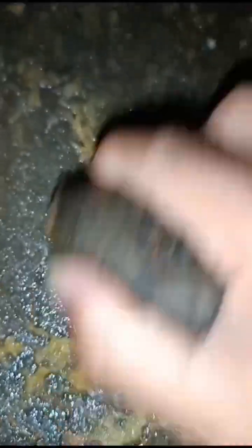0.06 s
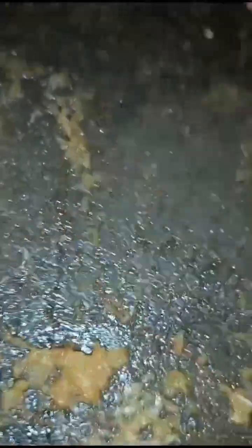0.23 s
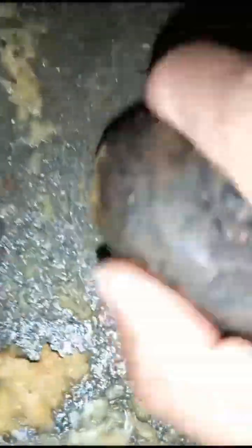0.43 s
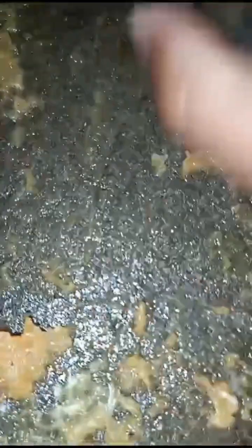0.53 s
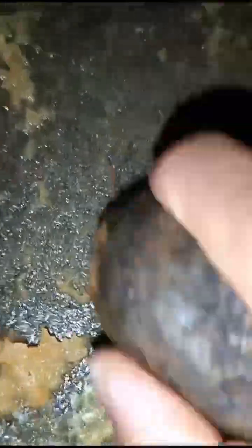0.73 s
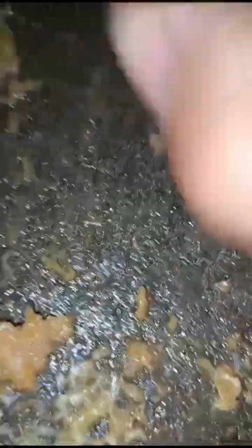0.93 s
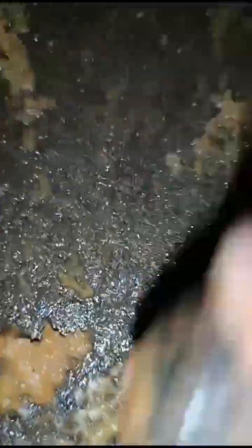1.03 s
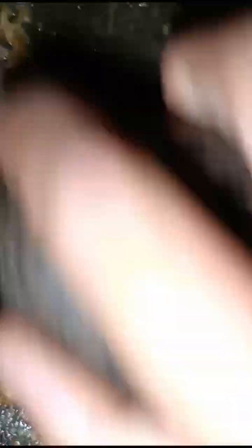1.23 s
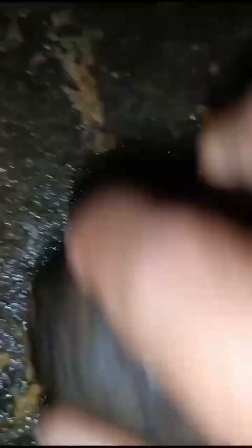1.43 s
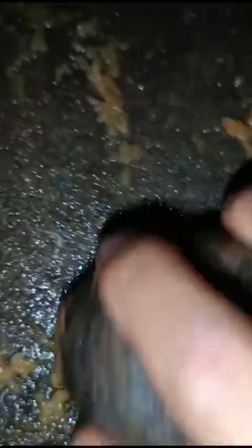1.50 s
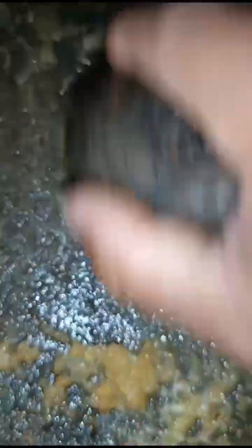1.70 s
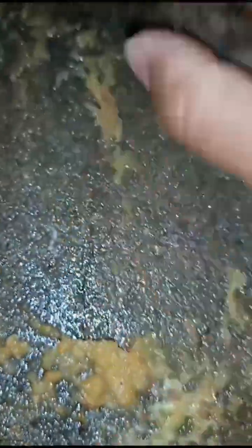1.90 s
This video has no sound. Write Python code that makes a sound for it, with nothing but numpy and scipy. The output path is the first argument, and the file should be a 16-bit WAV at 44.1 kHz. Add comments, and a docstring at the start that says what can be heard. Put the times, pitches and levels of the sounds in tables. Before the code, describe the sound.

A hand stone grinds garlic on a stone slab, close by in a quiet kitchen. It lands with a hard clack, rasps four times, pauses, thuds down and rasps about five more times, with faint wet crackles.

```python
"""A hand stone grinds garlic on a stone slab in a kitchen, heard from close by.
After a faint scrape the stone lands, and the impact excites its modes in a hard clack. Four strokes
follow: friction on grit rings both stones, wet garlic hisses, spits and snaps, and the slab rumbles
on its support. The stone lifts, then thuds down, cushioned by the paste. It rasps five more times
and slides to rest, leaving the quiet background of the room."""
import sys
import numpy as np
from scipy import signal
from scipy.fft import rfft, irfft
from scipy.io import wavfile
from scipy.ndimage import uniform_filter1d

SR = 44100
rng = np.random.default_rng(int(sys.argv[2]) if len(sys.argv) > 2 else 0)


def generate_wav(signal):
    """Clip the signal to [-1, 1] and save it as 16-bit WAV at the path in sys.argv[1]."""
    frames = np.transpose(np.atleast_2d(signal))
    scaled = np.clip(frames, -1, 1) * 32767
    pcm = np.round(scaled).astype(np.int16)
    wavfile.write(sys.argv[1], SR, pcm)


N = 85995
TIME = np.arange(N) / SR
HZ = np.fft.rfftfreq(2 * N, 1 / SR)
GRIT_PER_S, GRIT_SPREAD_DB = 6000, 4.5


def amp(db):
    """The decibel law: level to amplitude ratio."""
    return 10 ** (np.asarray(db) / 20)

def unit(x):
    """Normalisation to an rms of 1."""
    return x / np.sqrt(np.mean(x ** 2) + 1e-20)

def read(points, hz=HZ):
    """Interpolation of a table on a logarithmic frequency axis."""
    f, value = np.transpose(points)
    return np.interp(np.log(hz + 1), np.log(f), value)

def colour(x, points):
    """Minimum-phase filtering with the shape of a dB curve, at unit power gain."""
    log_gain = np.log(amp(read(points)))
    response = np.exp(np.conj(signal.hilbert(np.r_[log_gain, log_gain[-2:0:-1]])))[:N + 1]
    return irfft(rfft(x, 2 * N) * response / np.sqrt(np.mean(abs(response) ** 2)))[..., :N]

def pan(db):
    """Constant-power panning: two gains from a left-right level difference."""
    gains = amp(np.array([db, -db]) / 2)
    return gains / np.sqrt(np.mean(gains ** 2, 0))

def stereo(x, balance, phase=0):
    """Localisation by level and phase differences between the channels."""
    response = pan(read(balance)) * np.exp(-1j * phase * np.array([[0], [1]]))
    return irfft(rfft(x, 2 * N) * response)[:, :N]

def wander(hz):
    """Random modulation: low-passed noise, softly limited."""
    rolloff = 1 + (np.fft.rfftfreq(N, 1 / SR) / hz) ** 4
    slow = unit(irfft(rfft(rng.standard_normal(N)) / rolloff, N))
    return unit(np.tanh(slow / 1.6))

def grains(per_s, spread_db):
    """Shot noise: independent impulses of uneven size."""
    size = amp(spread_db * np.clip(rng.standard_normal(N), -2, 2))
    return unit(size * rng.choice([-1, 1], N) * (rng.random(N) < per_s / SR))

def patchy(x, width_hz, length_s, depth_db, size=256):
    """Spectral modulation: the colour shifts at random as the contact point moves."""
    spectra = signal.stft(x, nperseg=size)[2]
    field = rng.standard_normal(spectra.shape[:0:-1]).T
    bins, frames = max(round(width_hz * size / SR), 1), max(round(2 * length_s * SR / size), 1)
    for _ in range(2):
        field = uniform_filter1d(uniform_filter1d(field, bins, 0), frames, 1)
    return signal.istft(spectra * unit(amp(depth_db * unit(field))), nperseg=size)[1][:, :N]

def resonate(x, hz, width_hz):
    """A tunable damped resonance that preserves the power of white noise."""
    turn = np.exp(2j * np.pi * np.cumsum(hz * np.ones(N)) / SR)
    pole = np.exp(-np.pi * width_hz / SR)
    return (turn * signal.lfilter([np.sqrt(2 * (1 - pole ** 2))], [1, -pole], x / turn + 1e-18)).real


# Strokes of the hand (start [s], fastest [s], end [s], rasp level [dB], hiss level [dB],
# left-right [dB], hand stone base pitch [Hz], slab pitch [Hz], slab ring gain [dB], treble gain [dB])
STROKES = [(-.08, -0.005, 0.03, -42.5, -64.5, -6.5, 2130, 755, 3, -1.5),
           (0.225, 0.33, .39, -25, -50, -1.5, 2015, 773, -7, -2.5),
           (0.388, 0.488, 0.54, -30, -47.5, 1.5, 2188, 745, -2, 4),
           (0.531, 0.628, .69, -24.5, -48.5, -4.5, 2036, 766, -5.5, 4.5),
           (0.68, 0.764, 0.82, -28, -50.5, -0.5, 2024, 738, -0.5, 0.5),
           (1.084, 1.184, 1.278, -25, -48, -0.5, 2190, 612, -0.5, -0.5),
           (1.321, 1.365, 1.451, -29, -49.5, -1.5, 1970, 780, -8.5, 2.5),
           (1.433, 1.536, 1.5995, -26, -49, -3, 2187, 828.5, -5.5, 3),
           (1.603, 1.686, 1.738, -28, -49.5, -3.5, 2220, 860, -5.5, -2.5),
           (1.739, 1.797, 1.845, -33, -46, 0, 2220, 830, -1.5, -1.5),
           (1.8, 1.856, 1.912, -55.5, -62, -6, 2200, 830, -10, 15.5)]
# Broad response of the stones (frequency [Hz], relative level [dB])
STONE_RESPONSE = [(150, -27), (330, -18.5), (450, -11), (570, -4.5), (770, -4), (960, -8.5), (1080, -4.5),
                  (1270, -6), (1550, -4), (1750, -6), (2100, -7), (2420, -9.5), (2750, -9), (3200, -19.5),
                  (4000, -17.5), (5200, -28.5), (7000, -33.5), (10000, -59.5), (16000, -40.5)]
# Narrow modes of the slab (frequency [Hz], relative level [dB])
SLAB_MODES = [(580.7, -18.5), (787, -14.5), (1065, -15.5), (1428, -17.5), (2613, -17), (3888, -24.5)]
# Level difference of the rasp (frequency [Hz], left-right [dB])
RASP_BALANCE = [(300, -3), (550, 12), (780, 10), (960, 6), (1250, 12.5), (1550, 9.5), (1850, 2.5),
                (2200, -1), (2600, 1), (3300, -1), (4300, -3), (6000, 3)]
# Phase difference of the rasp (frequency [Hz], left lead [rad])
RASP_PHASE = [(300, 2.5), (450, 1.55), (600, -0.22), (850, -1.07), (1080, 2.5), (1350, 1.14), (1900, 0.94),
              (2150, 1.5), (2400, 1.5), (3200, 5)]

def rasp(echo_s=0.00281, echo_db=-17.5):
    """Forced vibration: grit drives the resonances of both stones."""
    _, fastest, _, level_db, _, side_db, hand_hz, slab_hz, slab_db, treble_db = np.transpose(STROKES)
    def by_stroke(values):
        return np.interp(TIME, fastest, values)
    body = colour(grit(level_db) + catches(), STONE_RESPONSE)
    # The path of a reflection across the slab changes with the stone's place.
    delay = echo_s * (1 + 0.19 * by_stroke((-1) ** np.arange(len(fastest))))
    body += amp(echo_db) * np.array([np.interp(TIME - delay, TIME, side) for side in body])
    treble = signal.sosfiltfilt(signal.butter(4, 3000, "high", fs=SR, output="sos"), body)
    body += treble * (amp(by_stroke(treble_db)) - 1)
    # The hand stone rings higher as it slows, and its pitch shifts with its place.
    ring_hz = by_stroke(hand_hz) * (1 + 0.08 * (1 - speeds().max(0)) + 0.034 * travel())
    rings = amp(0.5) * resonate(body, ring_hz, width_hz=266)
    rings += amp(by_stroke(slab_db)) * resonate(body, by_stroke(slab_hz), width_hz=146)
    rings += sum(amp(db) * resonate(body, hz, width_hz=0.025 * hz) for hz, db in SLAB_MODES)
    return stereo(0.65 * body + 0.2 * rings, RASP_BALANCE, read(RASP_PHASE)) * pan(by_stroke(side_db))

def speeds(grip=0.89):
    """Reciprocating motion: each stroke's speed is a flattened arch between turning points."""
    arch = np.array([np.sin(np.pi / 2 * np.interp(TIME, row[:3], [0, 1, 0])) for row in STROKES])
    return np.tanh(grip * arch) / np.tanh(grip)

def travel():
    """Displacement on the slab, -1 to 1: each stroke reverses the last."""
    return 2 * sum((-1) ** k * np.interp(TIME, row[:3], [0, .5, 1]) for k, row in enumerate(STROKES)) - 1

def friction(levels_db, exponent, drag_db, drag_s):
    """A power law: amplitude grows with speed, and light drag bridges the turning points."""
    energy = amp(levels_db) ** 2 @ speeds() ** (2 * exponent)
    drag = signal.fftconvolve(energy, np.hanning(int(2 * drag_s * SR)) / (drag_s * SR), "same")
    return np.sqrt(energy + amp(drag_db) ** 2 * abs(drag))

def grit(levels_db, apart=0.53, chatter_db=1.27):
    """Sliding friction: grit chatters in many tiny impacts, partly shared by both channels."""
    shared, left, right = (grains(GRIT_PER_S, GRIT_SPREAD_DB) for _ in range(3))
    impacts = np.sqrt(1 - apart ** 2) * shared + apart * np.array([left, right])
    impacts = patchy(impacts, width_hz=450, length_s=0.034, depth_db=3)
    chatter = unit(amp(chatter_db * wander(hz=144)))
    return impacts * chatter * friction(levels_db, exponent=1.82, drag_db=-33, drag_s=.1)

# Coarse grains breaking (time [s], relative level [dB])
CATCHES = [(.234, -5.5), (.294, -0.5), (.3045, -3.5), (.3312, 1.5), (.577, 0.5), (.637, -0.5), (.651, -6),
           (1.107, -25), (1.1778, 2.5), (1.2235, -1), (1.351, -13), (1.378, -0.5), (1.388, 0.5),
           (1.409, -5.5), (1.526, 6), (1.6905, 1), (1.829, -9.5)]

def catches(contact_s=0.00027):
    """Brittle fracture: each grain that catches and breaks gives a Gaussian pulse of force."""
    force = np.zeros(N)
    for time_s, db in CATCHES:
        pulse = np.exp(-(2 * (TIME - time_s) / contact_s) ** 2)
        force += 1.1 * amp(db) * pulse / pulse.sum()
    return force

# Gliding bands in the rasp (start [s], end [s], first pitch [Hz], last pitch [Hz], level [dB])
GLIDES = [(0.565, .67, 4200, 3760, -45), (1.17, 1.248, 2620, 2650, -31), (1.468, 1.6, 4150, 4670, -47),
          (1.611, 1.69, 4100, 4500, -46), (1.729, 1.762, 1890, 2140, -34.5)]

def singing_grit(relative_width=.11):
    """Narrow-band resonance: grit sings at a pitch that glides as the stone travels."""
    out = np.zeros((2, N))
    for start, end, first_hz, last_hz, db in GLIDES:
        progress = np.clip((TIME - start) / (end - start), 0, 1)
        hz = first_hz + (last_hz - first_hz) * progress
        width_hz = relative_width * first_hz
        impacts = np.array([grains(GRIT_PER_S, GRIT_SPREAD_DB) for _ in range(2)])
        band = resonate(resonate(impacts, hz, width_hz), hz, 2 * width_hz)
        out += amp(db) * np.sin(np.pi * progress) * unit(band)
    return out

# Modes of stone on stone (frequency [Hz], left level [dB], right level [dB], 60 dB decay time [s])
CLACK_MODES = [(736, 2.5, -0.5, 0.0091), (1744, 19.5, 9.5, 0.0043), (2224, 7.5, 20, 0.0075),
               (3070, -13.5, -20.5, .003), (2122, -37, -9.5, 0.023)]
# Modes of stone on paste (frequency [Hz], left level [dB], right level [dB], 60 dB decay time [s])
THUD_MODES = [(81.2, -18.5, -19.5, 0.28), (166, -18.5, -13, 0.076), (545, -1.5, -11, 0.0099)]

def landing(modes, time_s, rise_s, right_lag_s=0):
    """Free vibration: the hand stone's impact excites modes that decay exponentially."""
    age = np.maximum(TIME - time_s - np.array([[0], [right_lag_s]]), 0)
    ring = np.zeros((2, N))
    for hz, left_db, right_db, t60 in modes:
        ring += amp(np.array([[left_db], [right_db]]) - 60 * age / t60) * np.sin(2 * np.pi * hz * age)
    return ring * np.minimum(age / rise_s, 1) ** 2

# Garlic bursting (time [s], level [dB], time constant [s])
SPITS = [(.4495, -35, 0.002), (1.0798, -23, 0.0035), (1.1164, -38.5, 0.011), (1.2237, -32.5, 0.0064),
         (1.409, -36, 0.0017), (1.437, -41, 0.0062), (1.49, -25.5, 0.0012), (1.4957, -29.5, 0.015),
         (1.536, -44, 0.0018), (1.679, -37.5, 0.0023), (1.705, -39.5, 0.012), (1.7818, -33, 0.0024),
         (1.8289, -36.5, 0.0047)]
# Spectrum of the wet paste (frequency [Hz], relative level [dB])
PASTE_SPECTRUM = [(1000, -10), (3000, 2.5), (4500, -2.5), (6300, 4.5), (8200, -3.5), (11000, 1.5),
                  (14000, 1)]
# Level difference of the paste (frequency [Hz], left-right [dB])
PASTE_BALANCE = [(4000, -1.5), (6500, 1.5), (9000, 7.5), (11000, 20), (15000, 13.5)]

def paste(clump_db=1.2):
    """Shot noise: dense crackles of wet garlic merge into a hiss, broken by single spits."""
    hiss_db = np.transpose(STROKES)[4]
    envelope = friction(hiss_db, exponent=1.6, drag_db=-8, drag_s=.11)
    envelope *= unit(amp(clump_db * wander(hz=166.7)))
    fizz = np.array([grains(per_s=5600, spread_db=4) for _ in range(2)])
    fizz = patchy(fizz, width_hz=1700, length_s=.008, depth_db=4)
    return stereo(colour(fizz * envelope + bursts(SPITS), PASTE_SPECTRUM), PASTE_BALANCE)

# Firm bits snapping (time [s], level [dB], time constant [s])
CRUNCHES = [(.4682, -26.5, 0.0018), (.566, -38, 0.0024), (.7517, -31, 0.0066), (1.0763, -38, 0.0084),
            (1.14, -30.5, 0.0022)]
# Spectrum of a snap (frequency [Hz], relative level [dB])
CRUNCH_SPECTRUM = [(1200, -18), (3000, 10), (6500, -2), (9000, -17)]

def crunches():
    """Fracture: firm bits snap under the stone with a bright, dry tick."""
    return colour(bursts(CRUNCHES), CRUNCH_SPECTRUM)

def bursts(rows, rise_s=0.0012):
    """Noise transients with a linear rise and an exponential decay."""
    envelope = np.zeros(N)
    for time_s, db, decay_s in rows:
        age = np.maximum(TIME - time_s, 0)
        envelope += amp(db) * np.minimum(age / rise_s, 1) * np.exp(-np.maximum(age - rise_s, 0) / decay_s)
    return envelope * rng.standard_normal((2, N))

# Response of the slab on its support (frequency [Hz], relative level [dB])
SUPPORT_RESPONSE = [(20, -19.5), (65, -12.5), (81, 6), (100, -4), (190, -7.5), (250, -16), (340, -23.5),
                    (600, -54.5), (2000, -97.5)]
# Envelope of the rumble (time [s], relative level [dB])
RUMBLE_ENVELOPE = [(.035, -48), (.15, -68), (.215, -65), (.25, -44), (.31, -30), (.38, -38.5), (.6, -38),
                   (.76, -38), (.83, -42), (.92, -51), (1.075, -59), (1.1, -31), (1.17, -32), (1.26, -35),
                   (1.35, -47), (1.41, -35), (1.55, -34), (1.66, -50), (1.735, -34), (1.81, -39),
                   (1.95, -53.5)]

def rumble(apart=0.28, gain_db=-2):
    """Structure-borne sound: the stone's bumpy ride shakes the slab on its support."""
    envelope = amp(gain_db + np.interp(TIME, *np.transpose(RUMBLE_ENVELOPE)))
    bumps = rng.standard_normal(N) + apart * rng.standard_normal((2, N))
    return colour(bumps, SUPPORT_RESPONSE) * envelope

# Reverberation of the kitchen (frequency [Hz], 60 dB decay time [s])
REVERB_TIMES = [(100, 1), (600, 0.11), (2500, 0.55), (16000, 0.13)]

def kitchen(x, level_db=-23):
    """Reverberation: a diffuse tail in which each band decays at its own rate."""
    hz, age, spectra = signal.stft(rng.standard_normal((2, SR // 2)), SR, nperseg=256)
    decay = amp(-60 * age / read(REVERB_TIMES, hz)[:, None])
    tail = signal.istft(spectra * decay, SR, nperseg=256)[1]
    return amp(level_db) * signal.fftconvolve(x, tail / np.linalg.norm(tail[0]), axes=1)[:, :N]

# Spectrum of the quiet kitchen (frequency [Hz], relative level [dB])
AMBIENT_SPECTRUM = [(25, -23), (80, -4.5), (180, -8.5), (310, -2.5), (700, -22.5), (1900, -16.5),
                    (3100, -19), (4700, -27.5), (9000, -37.5), (16000, -37)]

def ambience(level_db=-59, sway_db=1.5):
    """Ambient noise: a faint, partly coherent background whose level wavers."""
    noise = unit(rng.standard_normal(N) + rng.standard_normal((2, N)))
    return amp(level_db + sway_db * wander(hz=15)) * colour(noise, AMBIENT_SPECTRUM)

def scene():
    """Superposition of direct sound, reverberation and ambient noise."""
    direct = rasp() + singing_grit() + crunches() + paste() + rumble()
    direct += landing(CLACK_MODES, time_s=.223, rise_s=0.00086, right_lag_s=0.00037)
    direct += landing(THUD_MODES, time_s=1.0825, rise_s=0.0053)
    return direct + kitchen(direct) + ambience()

def record(dry, low_cut_hz=74, full_scale=.84, top_hz=16000):
    """Band limiting and clipping: the microphones lose deep bass and overload on the clack."""
    high_pass = signal.butter(2, low_cut_hz, "high", fs=SR, output="sos")
    clipped = np.clip(signal.sosfilt(high_pass, dry), -full_scale, full_scale)
    low_pass = signal.firwin(801, top_hz, window=("kaiser", 8), fs=SR)
    return signal.oaconvolve(clipped, low_pass[None], "same")


dry = scene()
out = record(dry)
generate_wav(out)
```